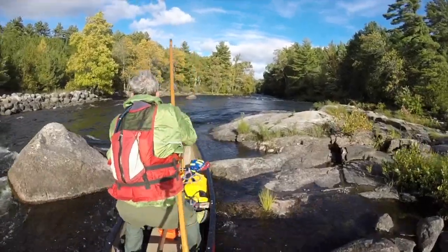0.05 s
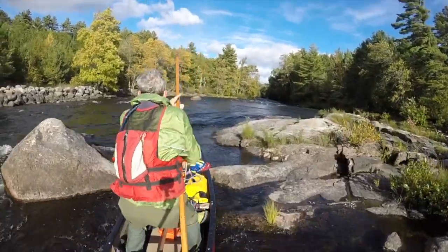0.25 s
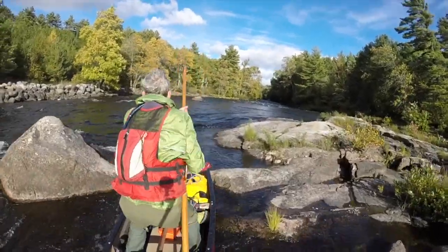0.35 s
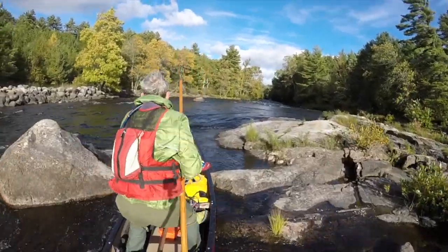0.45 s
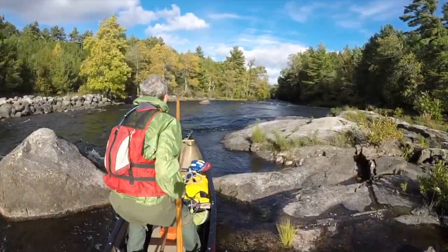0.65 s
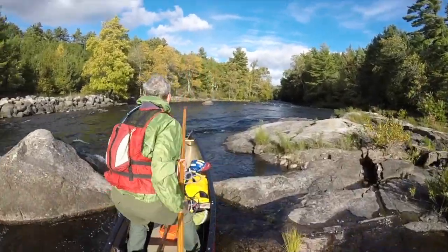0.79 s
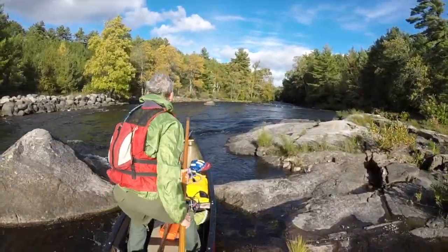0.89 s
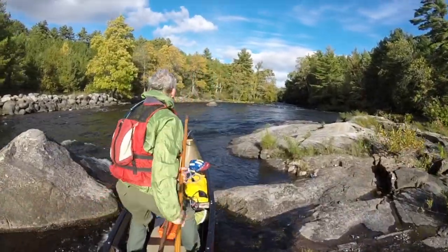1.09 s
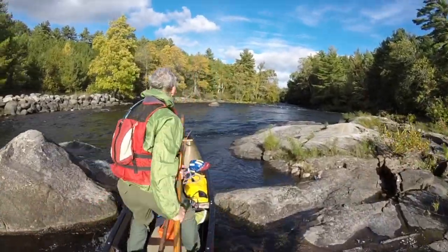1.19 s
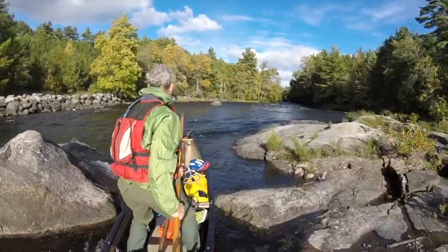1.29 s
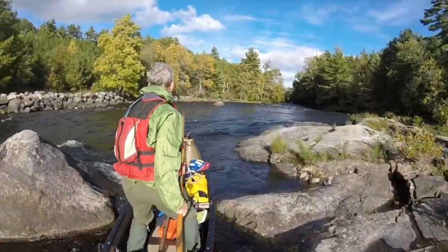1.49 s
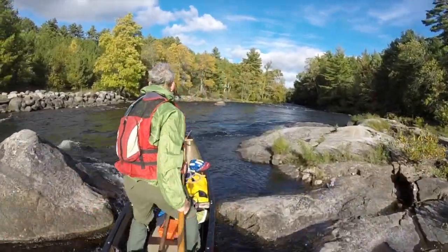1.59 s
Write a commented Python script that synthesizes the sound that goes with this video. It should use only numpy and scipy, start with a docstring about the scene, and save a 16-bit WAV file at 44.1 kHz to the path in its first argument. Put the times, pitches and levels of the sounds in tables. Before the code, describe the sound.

A canoe scrapes and bumps on rock, heard from on board over a soft, steady hiss of rapids. At 0.2 seconds a hollow thump starts a low, juddering rub. The hardest knock comes near 0.55 seconds, with a pole grating on stone. A second scrape with several knocks follows around 1 second, then fades. A few small bubbles plop from 1.3 to 1.5 seconds as the water keeps flowing.

```python
"""A canoe poled up a rocky river

Heard from on board, the rapids hiss steadily and bubbles plop alongside by resonance.
Stick-slip friction on a rock makes the hull judder and boom. The pole grates on stone
and knocks against the boat, each impact exciting the normal modes of hull and pole.
An automatic gain control ducks the whole sound at the hardest knock and slowly recovers."""
import sys
import numpy as np
from scipy import signal
from scipy.fft import rfft, irfft
from scipy.io import wavfile
from scipy.ndimage import uniform_filter1d

SR = 44100
rng = np.random.default_rng(int(sys.argv[2]) if len(sys.argv) > 2 else 0)


def inscribe(sig):
    """Save sig as 16-bit PCM at rate SR to the path in sys.argv[1].

    A 1-D sig is mono; a 2-D sig holds one channel per row.
    Samples are clipped to [-1, 1] before scaling.
    """
    pcm = np.round(np.clip(np.atleast_2d(sig).T, -1, 1) * 32767)
    wavfile.write(sys.argv[1], SR, pcm.astype(np.int16))


N = 72765
T = np.arange(N) / SR


def from_db(db):
    """Amplitude ratio of a level in decibels."""
    return 10 ** (np.asarray(db) / 20)


def unit_rms(x):
    """Normalisation to an rms of 1."""
    return x / np.sqrt(np.mean(x ** 2) + 1e-20)


def low_pass(x, hz, order=2):
    """Butterworth low-pass filter."""
    return signal.sosfilt(signal.butter(order, min(hz, .45 * SR), fs=SR, output="sos"), x)


def high_pass(x, hz, order=4):
    """Butterworth high-pass filter."""
    return signal.sosfilt(signal.butter(order, hz, "high", fs=SR, output="sos"), x)


def colour(x, spectrum):
    """Spectral shaping by a curve interpolated over log frequency; rms 1."""
    hz, db = np.transpose(spectrum)
    bin_hz = np.maximum(np.arange(N // 2 + 1) * SR / N, 1)
    gain = from_db(np.interp(np.log(bin_hz), np.log(hz), db))
    return unit_rms(irfft(rfft(x) * gain, N))


def drift(points_per_s):
    """Random modulation: straight lines between Gaussian values; rms 1."""
    points = rng.standard_normal(400)
    return unit_rms(np.interp(T * points_per_s, np.arange(len(points)), points))


def impulses(per_s, spread_db):
    """A Poisson process: independent clicks of uneven size and either sign."""
    sizes = from_db(spread_db * np.minimum(rng.exponential(1, N), 4))
    signs = rng.choice([-1, 1], N)
    return sizes * signs * (rng.random(N) < per_s / SR)


def contact_pulse(start_s, length_s):
    """A contact force of unit impulse: the longer it lasts, the less treble it holds."""
    force = np.sin(np.pi * np.clip((T - start_s) / length_s, 0, 1)) ** 2
    return force / (force.sum() + 1e-12)


def resonator(force, hz, t60_s):
    """A damped harmonic oscillator: a unit impulse starts a decaying sine of amplitude 1."""
    decay = np.exp(-np.log(1000) / (t60_s * SR))
    step = 2 * np.pi * hz / SR
    return signal.lfilter([0, np.sin(step)], [1, -2 * decay * np.cos(step), decay ** 2], force + 1e-18)


def modal_sum(force, modes):
    """Superposition: the normal modes of a body respond independently to one force."""
    return sum(from_db(db) * resonator(force, hz, t60_s) for hz, db, t60_s in modes)


def steady(x, window_s=0.028):
    """Division by the running rms holds the level and keeps the fast roughness."""
    size = int(window_s * SR)
    power = uniform_filter1d(uniform_filter1d(x ** 2, size), size)
    return x / np.sqrt(power + 1e-3 * np.mean(x ** 2))


# Spectral envelope of the rushing water: frequency_hz, relative_level_db
RAPIDS_SPECTRUM = [(30, 10), (43, 19.5), (65, 5), (95, 12), (150, 0.5), (245, 14), (330, -2), (470, -7),
                   (760, -5.5), (1300, -9.5), (2600, -7), (4000, -14), (4800, -18.5), (5600, -15),
                   (6300, -21), (8500, -27.5), (9600, -29.5), (10500, -25.5), (12000, -35.5), (15000, -36)]

def rapids(wash_db=-39.5, flicker_db=1.2, bubbles_db=-51):
    """Broadband noise flickers band by band, over the resonance of many small bubbles."""
    edges_hz = np.geomspace(25, 18000, 17)
    wash = 0
    for band_hz in zip(edges_hz, edges_hz[1:]):
        band_pass = signal.butter(2, band_hz, "band", fs=SR, output="sos")
        band = signal.sosfilt(band_pass, rng.standard_normal(N))
        wash += band * from_db(flicker_db * drift(points_per_s=45.27))
    pitches_hz = np.geomspace(650, 4200, 20)
    births = impulses(per_s=240, spread_db=2.5)
    pitch_index = rng.integers(0, len(pitches_hz), N)
    bubbles = sum(resonator(births * (pitch_index == k), hz, t60_s=18 / hz)
                  for k, hz in enumerate(pitches_hz))
    return from_db(wash_db) * colour(wash, RAPIDS_SPECTRUM) + from_db(bubbles_db) * unit_rms(bubbles)


# Large bubbles beside the hull: start_s, pitch_hz, level_db, t60_s
LARGE_BUBBLES = [(.119, 723, -22.5, 0.047), (1.341, 813, -17.5, 0.04), (1.343, 674, -18.5, .1),
                 (1.402, 857, -31, 0.09), (1.537, 995, -23, 0.058)]

def plops(attack_s=0.0077, rise_per_s=0.33):
    """Bubble resonance: each bubble rings as a damped sine whose pitch rises slightly."""
    out = 0
    for start_s, hz, db, t60_s in LARGE_BUBBLES:
        age = np.maximum(T - start_s, 0)
        envelope = (1 - np.exp(-age / attack_s)) * np.exp(-np.log(1000) * age / t60_s)
        phase = 2 * np.pi * hz * age * (1 + rise_per_s * age / 2)
        out += from_db(db) * envelope * np.sin(phase)
    return out


# Shifts of load on the boat's bottom: start_s, impulse_db
LOAD_SHIFTS = [(.005, -34.5), (0.256, -18.5), (0.479, -20.5), (0.548, -14), (1.022, -10.5)]

def bottom_flex():
    """Free vibration: the bottom swings in one low mode after each shift of load."""
    force = sum(from_db(db) * contact_pulse(start_s, length_s=0.004) for start_s, db in LOAD_SHIFTS)
    return resonator(force, hz=43.94, t60_s=1)


# Spectral envelope of crushed grit: frequency_hz, relative_level_db
GRIT_SPECTRUM = [(300, -26), (900, 9), (2000, 2), (3500, -1.5), (6000, -14.5), (9000, -13.5),
                 (11500, -29.5), (14000, -52)]
# High modes of the pole's shaft: frequency_hz, gain_db, t60_s
SHAFT_MODES = [(1896, 0, .04), (2260, 0.5, 0.025), (2530, -3.5, 0.017), (2870, -4.5, 0.058),
               (3547, -5, .025), (5360, -9, 0.019)]
GRAINS_PER_S = 4900

def crushed_grit(spread_db, shaft_db=-3.5):
    """Shot noise: breaking grains of stone sound directly and excite the shaft; rms 1."""
    fractures = impulses(GRAINS_PER_S, spread_db)
    shaft = from_db(shaft_db) * unit_rms(modal_sum(fractures, SHAFT_MODES))
    return unit_rms(colour(fractures, GRIT_SPECTRUM) + shaft)


# Scrapes of the pole's tip on stone: peak_s, level_db, rise_s, fall_s, cutoff_hz
TIP_SCRAPES = [(0.375, -33.5, .002, 0.0018, 9000), (0.478, -38, 0.0026, 0.0033, 9000),
               (0.538, -28, 0.0005, 0.0031, 9000), (0.553, -21, 0.0021, 0.0014, 12000),
               (0.558, -25.5, 0.0062, 0.0087, 2600), (0.576, -47, .002, 0.0025, 7150),
               (0.959, -23, 0.0073, 0.0046, 5200), (1.008, -32.5, 0.0045, 0.0091, 3160)]

def tip_grating():
    """Abrasion: the tip crushes grit in short bursts that grow and decay exponentially."""
    out = 0
    for peak_s, db, rise_s, fall_s, cutoff_hz in TIP_SCRAPES:
        envelope = np.exp(-np.maximum((peak_s - T) / rise_s, (T - peak_s) / fall_s))
        out += from_db(db) * low_pass(envelope * crushed_grit(spread_db=2.5), cutoff_hz)
    return out


# Modes of the pole's metal shoe: frequency_hz, gain_db, t60_s
SHOE_MODES = [(2980, -31, 0.011), (5380, -30.5, 0.0056), (10750, -33, 0.0039), (11500, -46, .008)]

def shoe_click(start_s=0.5518):
    """Impulse response: the shoe strikes stone once and its high modes die away quickly."""
    strike = np.zeros(N)
    strike[int(start_s * SR)] = 1
    return low_pass(modal_sum(strike, SHOE_MODES), 16000, order=8)


# Modes of the pole and gunwale: frequency_hz, gain_db, t60_s
POLE_MODES = [(600.4, -14.5, 0.14), (705, -9.5, 0.11), (750.7, -7, 0.087), (785, -14, 0.15),
              (895.4, -11.5, 0.094), (1013, -18, 0.06), (1154, -22.5, 0.056)]

def pole(force):
    """Modal resonance: the thin pole and the gunwale ring in a hollow middle range."""
    ringing = modal_sum(force, POLE_MODES)
    return low_pass(high_pass(ringing, 633), 1065, order=3)


# Modes of the hull: frequency_hz, gain_db, t60_s
HULL_MODES = [(104, -9.5, 0.51), (118.5, -8, 0.29), (173.2, -6.5, 0.25), (197.4, -12, 0.24),
              (253.9, -9.5, 0.21), (286.8, -5.5, 0.12), (316.3, -15, 0.074)]

def hull(force):
    """Modal resonance: the hull booms within a narrow low band."""
    ringing = modal_sum(force, HULL_MODES)
    return high_pass(low_pass(ringing, 330, order=6), 96.4, order=6)


# Course of the hull's rub on the rock: time_s, boom_db, brightness_db, rasp_db
RUB_CONTOUR = [(0, -29, 7, -37.5), (0.038, -29, -8.5, -49), (0.079, -28, 2.5, -46), (.14, -39.5, -8, -51.5),
               (0.22, -37.5, -4.5, -41.5), (.24, -11, -6.5, -29), (.268, -9, -10, -31.5),
               (.32, -10.5, -4.5, -30.5), (0.388, -5.5, -9, -31), (.43, -10, -6, -36), (.46, -9.5, 4, -28),
               (.5, -15, -5.5, -37), (.54, -8, -9.5, -39), (.57, -7, 1, -14.5), (0.611, -8.5, -13.5, -37),
               (0.692, -21, -7, -39.5), (.81, -17, -1, -41.5), (0.919, -20.5, -7, -43),
               (0.963, -7.5, 0, -25), (1.007, -7.5, 1.5, -24.5), (1.051, -17.5, -2, -34),
               (1.169, -28.5, -12, -52), (1.232, -39, -5.5, -78), (1.33, -40.5, -9, -56),
               (1.408, -34, -5, -47), (1.65, -48, -2.5, -49.5)]

def hull_rubbing(crossover_hz=213.5, grit_db=-16):
    """Stick-slip friction shakes hull and gunwale and crushes grit on the rock."""
    times_s, *curves_db = np.transpose(RUB_CONTOUR)
    boom_gain, brightness, rasp_gain = (from_db(np.interp(T, times_s, db)) for db in curves_db)
    slips = impulses(per_s=380, spread_db=2)
    judder = hull(slips)
    deep = steady(low_pass(judder, crossover_hz, order=6))
    upper = steady(high_pass(judder, crossover_hz, order=6))
    # The boom shifts between deeper and brighter as the contact point moves along the hull.
    boom = (deep + brightness * upper) / np.sqrt(1 + brightness ** 2)
    grains = from_db(-14.5) * impulses(GRAINS_PER_S, spread_db=1.28)
    rasp = steady(pole(slips + grains))
    grit = from_db(grit_db) * low_pass(crushed_grit(spread_db=2), 6500)
    return boom_gain * boom + rasp_gain * (rasp + grit)


# Blows of rock and pole on the hull: start_s, hull_impulse_db, contact_ms, pole_impulse_db
BLOWS = [(0.018, -15.5, 1.23, -20.5), (0.183, -28, 1.3, -54), (.231, -1, 1.57, -36.5),
         (.374, -13.5, 5.1, -28), (.455, -12, 0.53, -20.5), (.513, -17, 1.1, -21.5), (0.555, 5.5, 2, 1),
         (.591, -8.5, 2.95, -55), (0.797, -12, 4, -53), (.859, -13, 3.6, -16), (.957, 0.5, 4.3, -11),
         (.997, -3, 2.05, -19), (1.027, -10, 1.8, -17)]

def knocks(hard_edge_s=0.00047):
    """Impact excitation: the soft part of a blow drives the hull, its brief hard edge the pole."""
    soft = hard = 0
    for start_s, hull_db, contact_ms, pole_db in BLOWS:
        soft += from_db(hull_db) * contact_pulse(start_s, contact_ms / 1000)
        hard += from_db(pole_db) * contact_pulse(start_s, hard_edge_s)
    return hull(soft) + pole(hard)


def scene():
    """Linear superposition: boat, pole and water add at one point, in one channel."""
    boat_and_pole = hull_rubbing() + knocks() + shoe_click() + bottom_flex() + tip_grating()
    water = plops() + rapids()
    return (boat_and_pole + water)[None]


def record(dry, limit_db=-20, window_s=0.017, attack_s=0.0036, recovery_db_per_s=8):
    """Automatic gain control: gain drops fast and creeps back; peaks clip and the top is cut."""
    sensed = high_pass(dry[0], 510, order=2)  # the control responds less to bass
    power = np.abs(uniform_filter1d(sensed ** 2, int(window_s * SR)))
    excess_db = np.maximum(10 * np.log10(power + 1e-12) - limit_db, 0)
    recovery_db = recovery_db_per_s * T
    held_db = np.maximum.accumulate(excess_db + recovery_db) - recovery_db
    lag = np.exp(-1 / (attack_s * SR))
    reduction_db = signal.lfilter([1 - lag], [1, -lag], held_db)
    clipped = np.clip(dry * from_db(-reduction_db), -1, 1)
    treble_cut = signal.cheby2(12, 70, 15700, fs=SR, output="sos")
    return signal.sosfilt(treble_cut, clipped)


dry = scene()
out = record(dry)
inscribe(out)
```